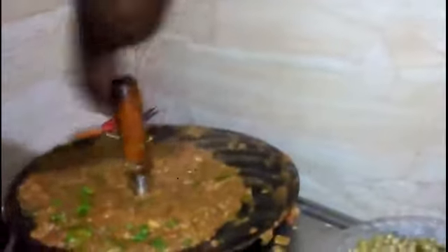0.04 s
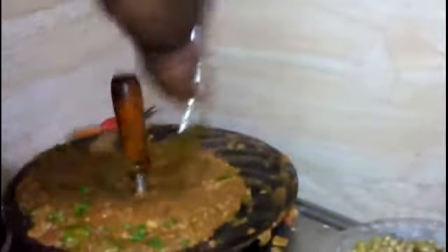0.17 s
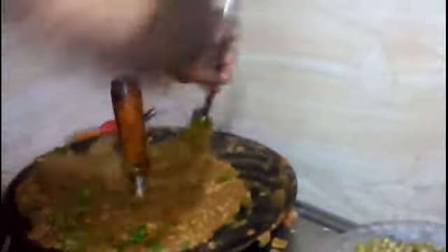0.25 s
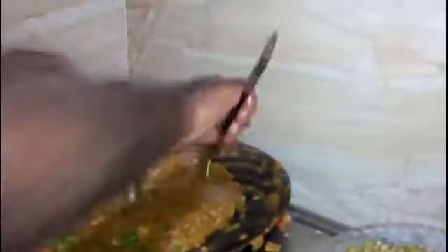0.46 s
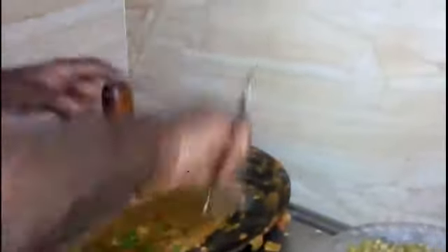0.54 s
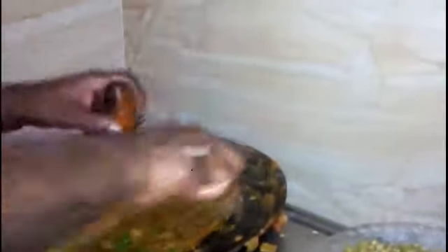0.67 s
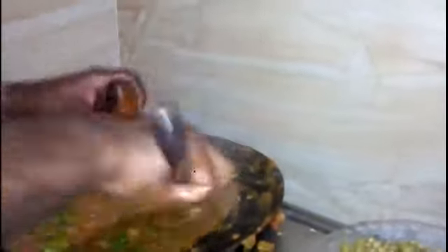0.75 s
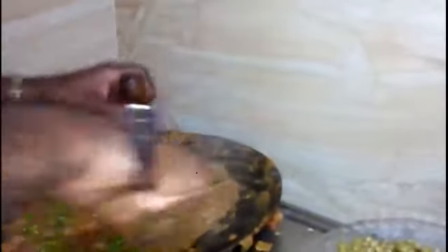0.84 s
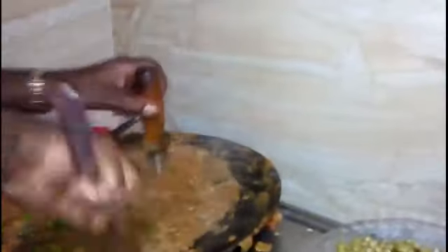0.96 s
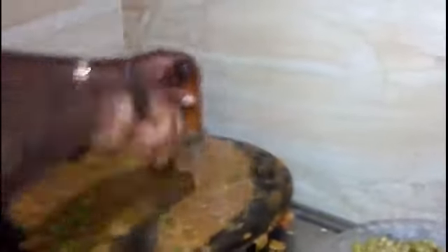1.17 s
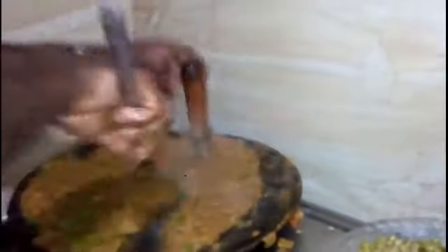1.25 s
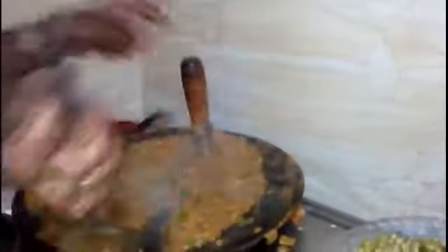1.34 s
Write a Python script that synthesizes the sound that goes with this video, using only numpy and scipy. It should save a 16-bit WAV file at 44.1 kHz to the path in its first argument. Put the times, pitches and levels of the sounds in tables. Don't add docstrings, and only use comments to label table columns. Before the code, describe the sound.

A metal spatula scrapes across a heavy griddle, chops three times, then lands and scrapes again

```python
import sys
import numpy as np
from scipy import signal
from scipy.fft import rfft, irfft
from scipy.io import wavfile
from scipy.ndimage import uniform_filter1d

SR = 44100
rng = np.random.default_rng(int(sys.argv[2]) if len(sys.argv) > 2 else 0)


def how_loud(loudness_db):
    steps = np.asarray(loudness_db, float) / 20
    return 10 ** steps


def master(y):
    cut = np.clip(np.atleast_2d(y).T, -1, 1)
    pcm = np.round(cut * 32767)
    wavfile.write(sys.argv[1], SR, pcm.astype(np.int16))


N = 61739
T = np.arange(N) / SR


def rms_one(x):
    return x / np.sqrt(np.mean(x ** 2) + 1e-20)


def at_hz(points, hz):
    table_hz, value = np.transpose(points)
    return np.interp(np.log(hz), np.log(table_hz), value)


def colour(x, spectrum):
    hz = np.maximum(np.fft.rfftfreq(len(x), 1 / SR), 1)
    return rms_one(irfft(rfft(x) * how_loud(at_hz(spectrum, hz)), len(x)))


def band_pass(x, low_hz, high_hz, order=2):
    return signal.sosfilt(signal.butter(order, [low_hz, high_hz], "band", fs=SR, output="sos"), x)


def drift(rate):
    r = np.exp(-2 * np.pi * rate / SR)
    wander = signal.lfilter([1], [1, -2 * r, r * r], rng.standard_normal(N + SR))
    return rms_one(wander[SR:])


def gate(start, end, edge):
    return .25 * (1 + np.tanh((T - start) / edge)) * (1 - np.tanh((T - end) / edge))


def background():
    # t/s, level/dB
    stir_course = [(0, -36), (0.042, -49.5), (.15, -54.5), (.25, -46), (.45, -61), (.7, -59.5),
                   (.84, -57.5), (.93, -57), (1.0, -58.5), (1.22, -65), (1.32, -65.5), (1.4, -78)]
    # f/Hz, density/(dB per Hz)
    stir_tone = [(60, -36.5), (200, -24.5), (324, -11), (496, -3.5), (584, -10), (908, -4.5), (1840, -9.5),
                 (2600, -42)]
    # f/Hz, density/(dB per Hz)
    hiss_tone = [(12, -51), (20, -37.5), (81, 1), (638, -4.5), (1030, -2), (2120, -10.5), (15800, -16.5)]
    s, db = np.transpose(stir_course)
    stir_db = np.interp(T, s, db) - 0.5 + 2.5 * drift(6.9)
    stir = how_loud(stir_db) * colour(rng.standard_normal(N), stir_tone + [(6000, -56.5)])
    hiss = how_loud(-66) * colour(rng.standard_normal(N), hiss_tone)
    return stir + hiss


def kitchen():
    # f/Hz, t60/s
    room_decay = [(300, 0.37), (800, 0.32), (2000, 0.26), (4500, 0.25), (8500, 0.2), (10000, 0.19),
                  (12500, 0.17), (15000, 0.12)]
    first_echo_s = 0.0015
    t = T[:SR // 2]
    borders = 100 * 2 ** np.arange(0, 7.6, .5)
    echo = np.zeros(len(t))
    for low, high in zip(borders, borders[1:]):
        t60 = at_hz(room_decay, np.sqrt(low * high))
        echo += band_pass(rng.standard_normal(len(t)), low, high) * how_loud(-60 * t / t60)
    power = np.abs(rfft(echo)) ** 2
    even = np.sqrt(uniform_filter1d(power, size=600) / uniform_filter1d(power, size=50))
    echo = irfft(rfft(echo) * even, len(t))
    echo = echo * (1 - np.exp(-t / first_echo_s)) * np.clip((t[-1] - t) * 5 - .5, 0, 1)
    return echo / np.sqrt(np.sum(echo ** 2))


def touches():
    # t/s, level/dB, centre f/Hz, width/octaves, length/s
    brushes = [(0.16, -32, 780, 0.5, 0.016), (0.16, -46.5, 270, 0.81, 0.024),
               (0.237, -40.5, 10700, 0.79, 0.035), (0.39, -57.5, 5700, 0.72, 0.042),
               (.461, -52, 4200, 1.2, 0.0014), (0.602, -55, 2400, 0.18, 0.036),
               (0.631, -35.5, 480, 0.98, 0.0059), (0.79, -56, 5500, 1, 0.096),
               (0.859, -52.5, 294.6, 0.64, 0.079), (1.0018, -49.5, 4300, 3.3, 0.0089),
               (1.172, -45.5, 730, 0.52, 0.028), (1.248, -51, 5300, 0.83, 0.0072),
               (.479, -51, 3400, 0.89, 0.0026), (.682, -48, 14800, .2, .02), (.485, -52.5, 14500, .2, .015),
               (0.62, -50, 190, 1.5, .04), (0.639, -50, 260, 0.63, 0.023), (0.25, -52.5, 210, 1.3, 0.045)]
    out = np.zeros(N)
    for s, db, hz, octaves, length in brushes:
        t = np.maximum(T - s, 0) / length
        half = 2 ** (octaves / 2)
        puff = rng.standard_normal(N) * t * np.exp(-2 * t) + 1e-18
        brush = band_pass(puff, hz / half, hz * half, order=3)
        out += how_loud(db + 4.5) * brush / np.abs(brush).max()
    return out


def weave(start, end, count):
    note_s, low_hz, high_hz = 0.027, 1284, 7610
    pitch, when, size = rng.random((count, 3)).T
    hz = low_hz + (high_hz - low_hz) * (np.arange(count) + pitch) / count
    first = start + note_s / 2
    middle = first + (end - first) * when
    return [(f, -15.5 - 6 * z, s - note_s / 2, min(s + note_s / 2, end), 0)
            for f, s, z in zip(hz, middle, size)]


def sing(slips, note, narrow):
    hz, db, start, end, glide = note
    width_hz = (0.044 * hz + 74.7) * narrow
    evenness = np.clip(0.091 + 1 - narrow, 0, 1)
    r = np.exp(-np.pi * width_hz / SR)
    turning = np.exp(2j * np.pi * (hz * T + .5 * glide * (T - start) ** 2))
    caught = signal.lfilter([1], [1, -2 * r, r * r], slips / turning)
    held = caught / (np.abs(caught) + 1e-9) ** evenness
    tone = np.real(held * turning) * gate(start, end, 0.0043)
    tone = rms_one(tone) * np.sqrt((end - start) * SR / N)
    flutter_db = narrow * 3 * drift(70)
    return how_loud(db + flutter_db) * tone


def drags():
    # t/s, level/dB
    pressure = [
        [(0, -35.5), (.04, -36), (.13, -33.5), (.2, -34), (.222, -62)],
        [(1.02, -37), (1.075, -38.5), (1.11, -35.5), (1.15, -32.5), (1.172, -35)],
    ]
    # f/Hz, density/(dB per Hz)
    grit_tones = [
        [(450, -25), (750, -2.5), (1100, -6.5), (1700, -2), (2700, -8), (4500, -3), (7500, -13.5),
         (10500, -22.5), (15000, -40)],
        [(250, -24.5), (900, -2.5), (1600, -1), (2000, -10.5), (4000, -4), (7800, -9), (8800, -22),
         (11500, -19), (14000, -48)],
    ]
    grit_levels = [-5, -4]
    brightening = [73, 37]
    # f/Hz, level/dB, from t/s, to t/s, glide/(Hz/s)
    singing = [
        [(848, -11, 0.0056, 0.19, 0), (799, -7.5, 0.16, 0.185, -9), (707, -14, -0.23, 0.28, -4),
         (1583, -18, 0.13, 0.13, -2), (3420, -8, 0.032, 0.075, 0), (3550, -12.5, 0.068, .195, 0),
         (4070, -2, .074, 0.15, -3500), (3770, -7.5, .129, .15, 0), (4640, -10.5, 0.026, 0.073, 0),
         (4700, -12, 0.095, 0.146, 0), (5470, -10, 0.032, 0.076, 0), (5450, -13, .09, 0.12, 0),
         (5470, -9.5, .118, .166, 0), (5450, -14, .17, .185, 0), (4000, -11.5, 0.025, .06, 0),
         (6800, -16, 0.065, 0.086, -2), (6900, -16.5, 0.128, 0.166, 0), (6430, -16, 0.096, 0.156, 0),
         (8400, -17.5, 0.145, 0.19, 0), (8900, -22, 0.079, 0.127, 0), (10300, -30, .1, .2, 0)],
        [(860, -11.5, 1.2, 3.1, -10), (1543, -14, 1.11, 1.18, 3), (2645, -7.5, 1.03, 1.09, 900),
         (2447, -7, 1.088, 1.114, 0), (3085, -8.5, 1.095, 1.14, -4), (4010, -3, 1.035, 1.112, -700),
         (3910, -8, 1.12, 1.165, 702), (4540, -5.5, 1.085, 1.13, 1000), (4830, -12.5, 1.128, 1.17, 16995.5),
         (5540, -16, 1.028, 1.066, 0), (6700, -10, 1.035, 1.092, 6000), (6950, -9, 1.1, 1.162, 1000),
         (7430, -13, 1.055, 1.112, 0), (10500, -23, 1.01, 1.165, 0), (11800, -33, 1.03, 1.16, 0)],
    ]
    # f/Hz, level/dB, from t/s, to t/s, glide/(Hz/s)
    locked = [
        [],
        [(2359, -6, 1.116, 1.17, 0)],
    ]
    slips_per_s, slip_spread = 6400, 0.49
    out = np.zeros((2, N))
    for rows, tone, grit_db, rise, notes, steady in zip(
            pressure, grit_tones, grit_levels, brightening, singing, locked):
        s, db = np.transpose(rows)
        sizes = how_loud(slip_spread * np.minimum(rng.exponential(1, N), 4)) * rng.choice([-1, 1], N)
        slips = sizes * (rng.random(N) < slips_per_s / SR)
        grit = colour(slips, tone)
        growth = how_loud(rise * np.clip(T - s.mean(), -.2, .2))
        grit = how_loud(grit_db) * (grit + (growth - 1) * band_pass(grit, 7700, 15000))
        song = np.zeros(N)
        for note in notes + weave(s[0], s[-1], count=36):
            song += sing(slips, note, narrow=1)
        for note in steady:
            song += sing(slips, note, narrow=0.26)
        begin = s[0] - .02 * (s[0] < .01)
        stroke = how_loud(np.interp(T, s, db)) * gate(begin, s[-1], .004)
        out += np.array([grit, song]) * stroke
    return out


def chops():
    # t/s, peak level/dB, swell of the low ring/s, crack level/dB, tick level/dB
    blows = [
        (.241, -12.5, 0.0012, -2, -29),
        (0.4827, -3, 0.0025, -2, -21),
        (.682, -5, 0.0033, -0.5, -25.5),
        (1.0129, -11.5, 0.01, -9, -25.5),
    ]
    # f/Hz, level/dB, t60/s
    modes_rung = [
        [(423, -1, 0.07), (510, -7, .06), (2136, -14.5, 0.22), (1440, -5, 0.12), (1677, 1, .07),
         (1736, -6, 0.071), (2054, -4, 0.082), (3554, -23.5, 0.22), (3620, -7, 0.14), (6310, -25, .13)],
        [(375, -16, .08), (654, 2.5, 0.15), (684.4, -8.5, 0.42), (842, 1, 0.12), (890.6, -1.5, 0.12),
         (1190, -5.5, .12), (1220, 5.5, 0.037), (1347, -7.5, 0.11), (1770, -5, 0.15), (2400, -29, .12),
         (3114, -6.5, 0.14), (3850, -15, 0.24), (4486, -12, 0.17)],
        [(410, -12, .2), (725.4, -7.5, .12), (862, -3.5, 0.15), (1016, -13, .1), (1127, -6.5, 0.14),
         (1360, -13, .2), (2345, -15, .1), (2890, -6.5, .08), (3780, -12, .12), (4790, -1.5, 0.084),
         (6330, -7, 0.073)],
        [(661, 11.5, 0.1), (773, -1, 0.13), (855.6, -2, 0.11), (2634, 3, 0.029), (3380, -1, 0.027),
         (4000, 7.5, 0.037), (4600, -5.5, 0.059), (5440, 1, 0.022), (7070, 2, 0.024), (8400, -19, 0.027),
         (10660, -13.5, 0.061), (7860, -3, 0.025), (11720, -13, .03)],
    ]
    # f/Hz, density/(dB per Hz)
    crack_tones = [
        [(150, -48.5), (250, -18), (434, 1), (795, -11.5), (3330, -11), (6650, -11.5), (15500, -48.5)],
        [(150, -61), (250, -23.5), (583, -19.5), (635, -4.5), (867, -8), (6770, -22), (11500, -37),
         (14000, -56)],
        [(150, -48.5), (250, -16.5), (603, -22.5), (852, -6.5), (2130, -10.5), (3830, -8), (11500, -29),
         (14000, -38)],
        [(200, -41), (420, -8.5), (646, -1), (2020, -21.5), (3960, -6.5), (8000, -18), (8900, -29),
         (15500, -30)],
    ]
    crack_s, crack_rise_s, tick_s, tick_hz = 0.0065, 0.0016, 0.0015, 8360
    wobble_db, wobble_per_s = 4, 29
    cracks, rings = np.zeros(N), np.zeros(N)
    for (s, db, swell_s, crack_db, tick_db), modes, tone in zip(blows, modes_rung, crack_tones):
        t = np.maximum(T - s, 0)
        burst = (1 - np.exp(-t / crack_rise_s)) * np.exp(-t / crack_s)
        cracks += how_loud(db + crack_db) * burst * colour(rng.standard_normal(N), tone)
        bright = band_pass(rng.standard_normal(N), tick_hz / 2.2, tick_hz * 1.4)
        rings += how_loud(tick_db) * (T > s) * np.exp(-t / tick_s) * bright
        for hz, mode_db, t60 in modes:
            swell = (1 - np.exp(-t * (hz / 700) ** 2 / max(swell_s, 1e-4))) ** 2
            wobble = how_loud(wobble_db * np.tanh(t * wobble_per_s) * drift(wobble_per_s))
            decay = how_loud(db + mode_db - 11 - 60 * t / np.clip(t60, .01, .3))
            rings += decay * swell * wobble * np.sin(2 * np.pi * (hz * t + rng.random()))
    return cracks, rings


def microphone(x):
    dip_hz, dip_width_hz, dip_db = 561, 172, -16
    dip = signal.lfilter(*signal.iirpeak(dip_hz, dip_hz / dip_width_hz, fs=SR), x)
    return band_pass(x - (1 - how_loud(dip_db)) * dip, 260, 10900)


def scene():
    cracks, rings = chops()
    grit, song = drags()
    grit = grit + touches()
    send = how_loud(-5.5) * cracks + how_loud(-22) * rings + how_loud(-7.5) * grit + how_loud(-17.5) * song
    echoes = signal.fftconvolve(send, kitchen())[:N]
    blade = cracks + rings + grit + song + echoes
    return (microphone(blade) + background())[None]


def roll_off(x):
    return signal.sosfilt(signal.butter(12, 16000, fs=SR, output="sos"), x)


def record(dry):
    ceiling = 1.2
    held = dry / (1 + (dry / ceiling) ** 4) ** .25
    top_cut = signal.cheby2(10, 60, 16600, fs=SR, output="sos")
    return roll_off(signal.sosfilt(top_cut, held))


dry = scene()
out = record(dry)
master(out)
```